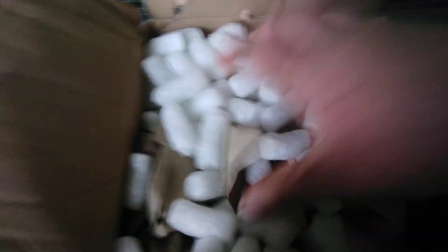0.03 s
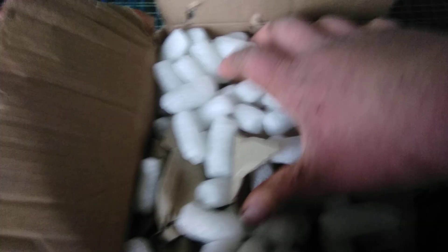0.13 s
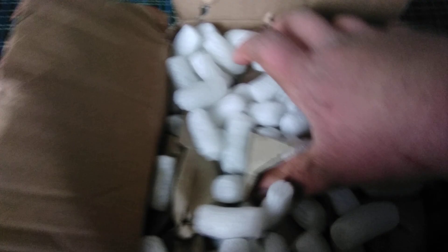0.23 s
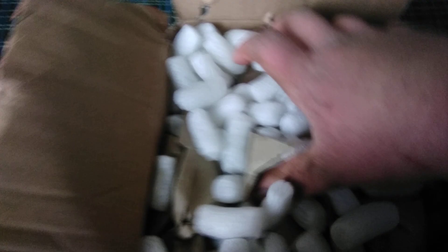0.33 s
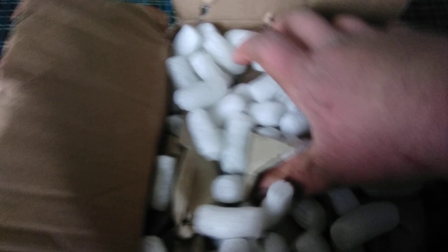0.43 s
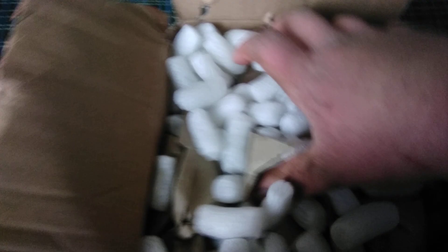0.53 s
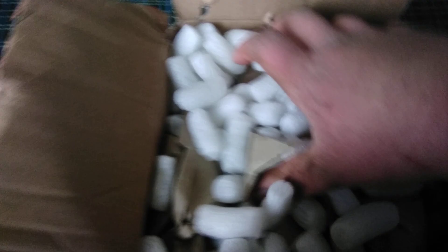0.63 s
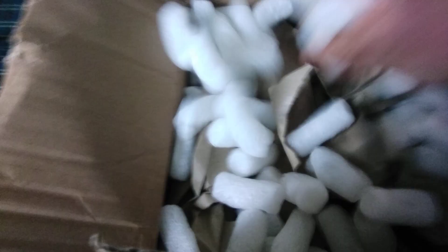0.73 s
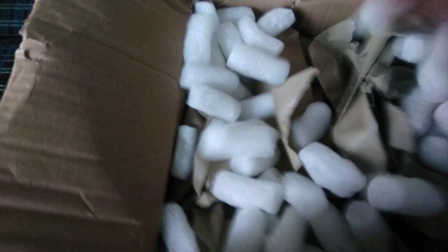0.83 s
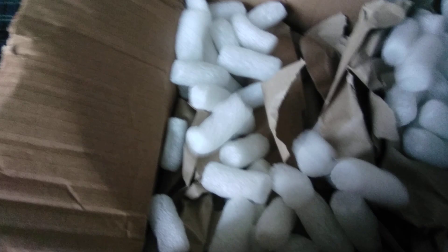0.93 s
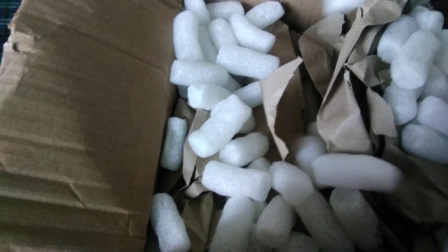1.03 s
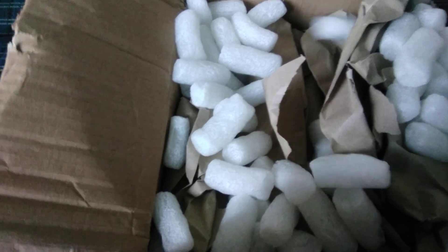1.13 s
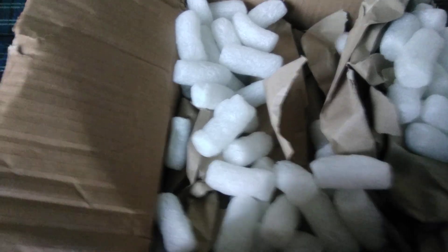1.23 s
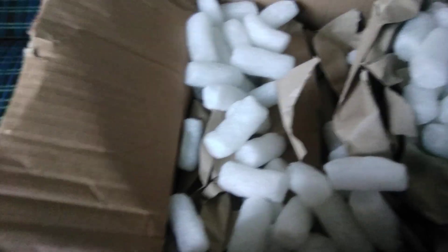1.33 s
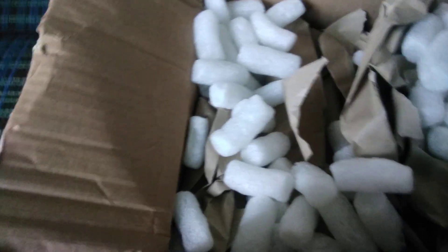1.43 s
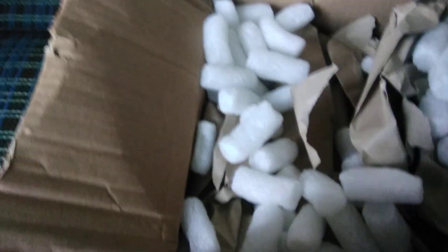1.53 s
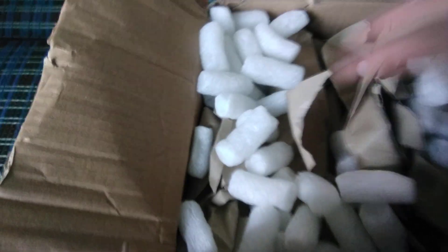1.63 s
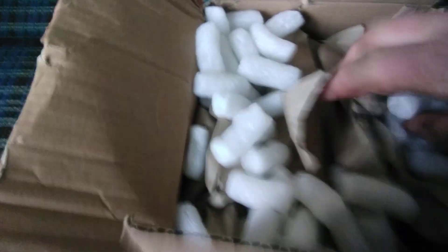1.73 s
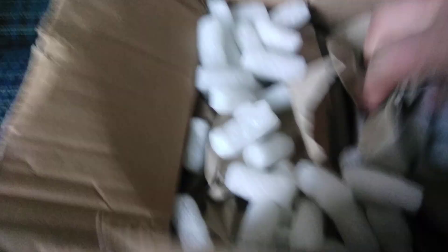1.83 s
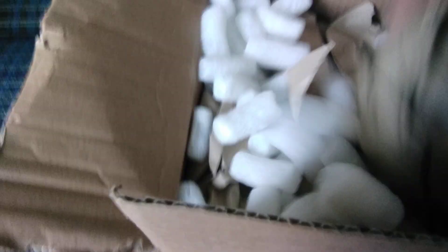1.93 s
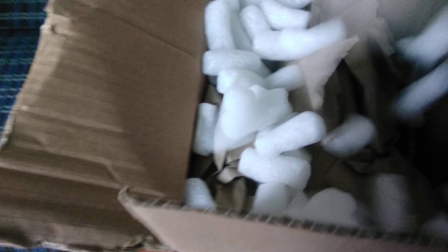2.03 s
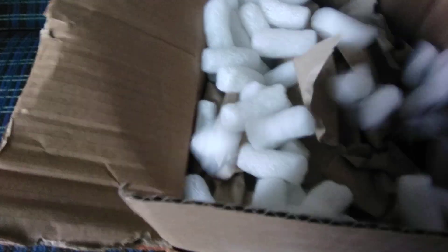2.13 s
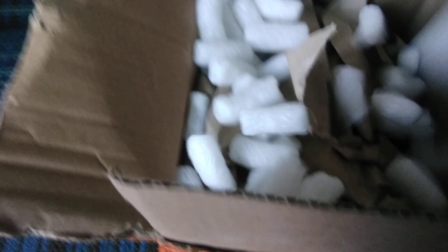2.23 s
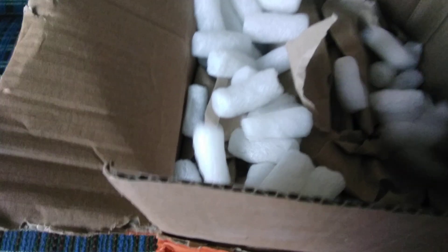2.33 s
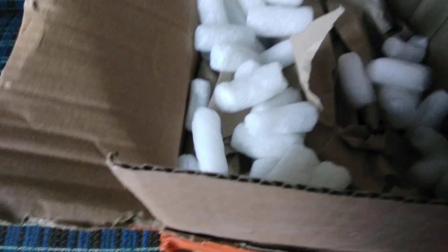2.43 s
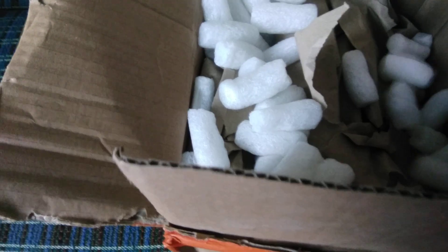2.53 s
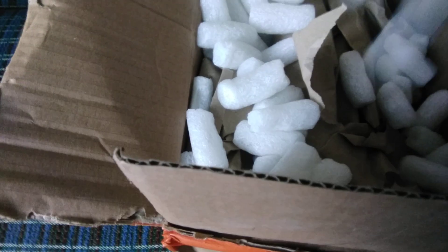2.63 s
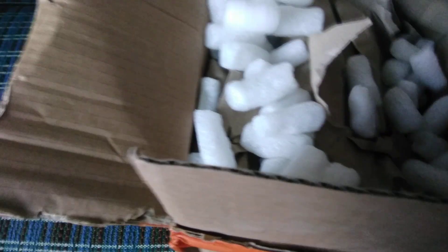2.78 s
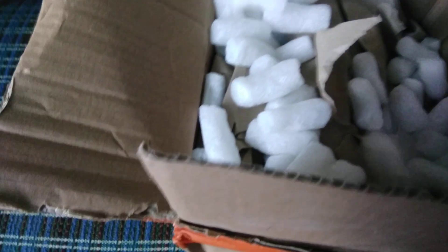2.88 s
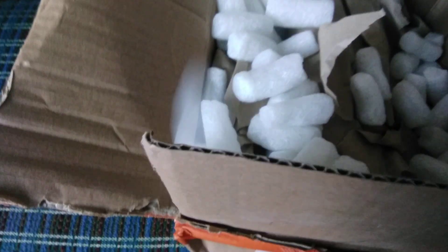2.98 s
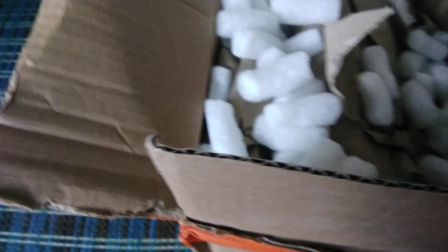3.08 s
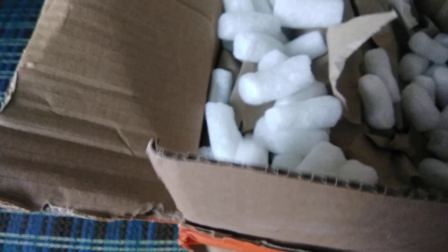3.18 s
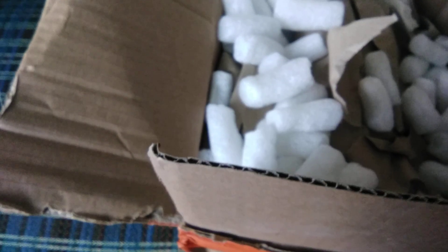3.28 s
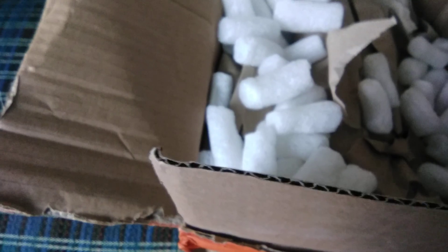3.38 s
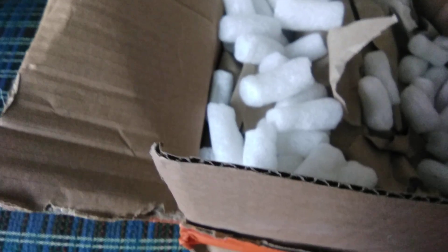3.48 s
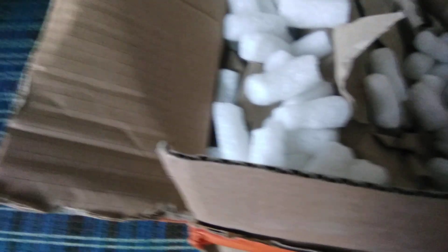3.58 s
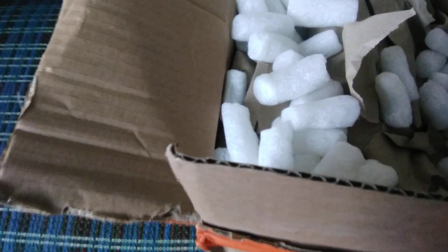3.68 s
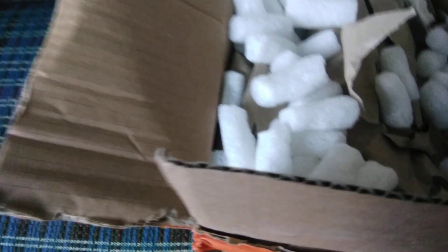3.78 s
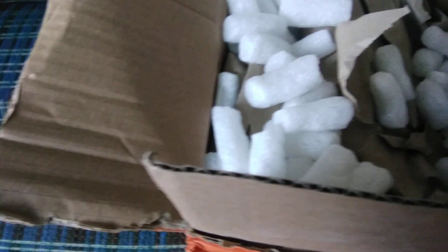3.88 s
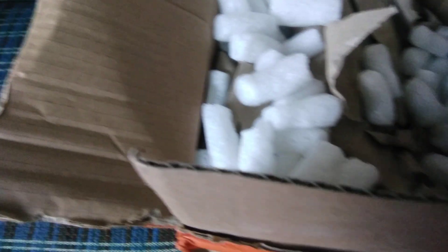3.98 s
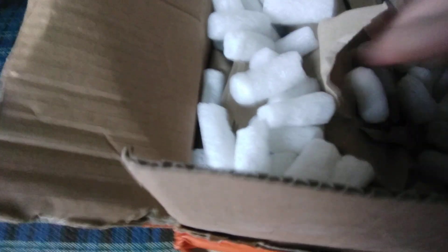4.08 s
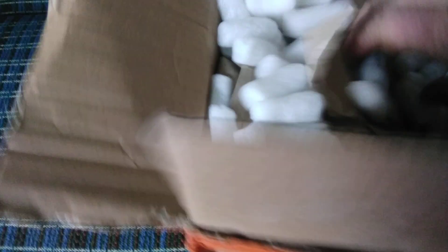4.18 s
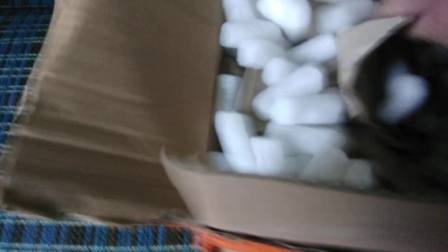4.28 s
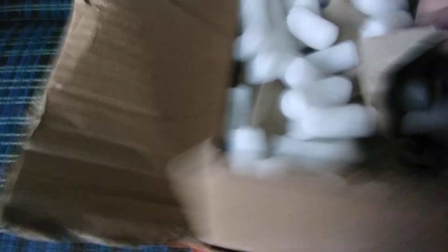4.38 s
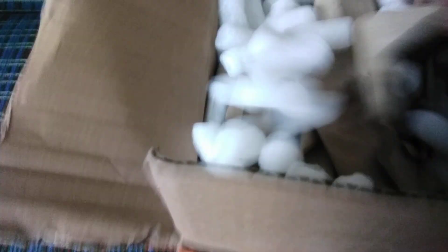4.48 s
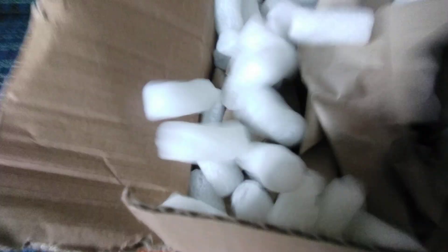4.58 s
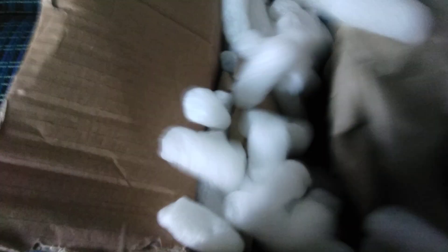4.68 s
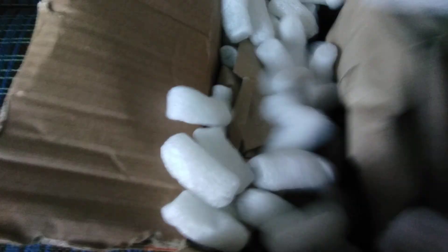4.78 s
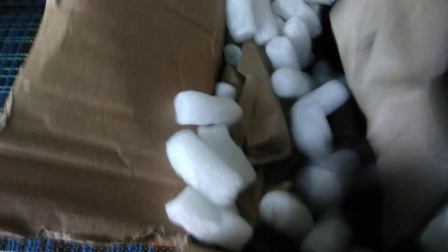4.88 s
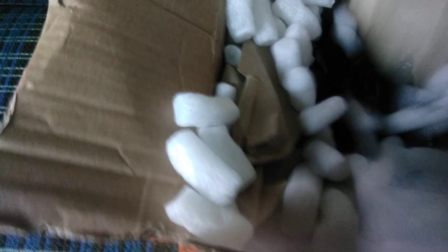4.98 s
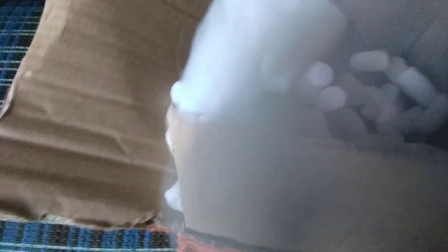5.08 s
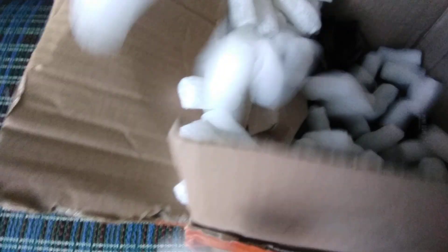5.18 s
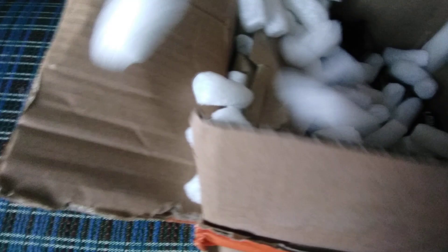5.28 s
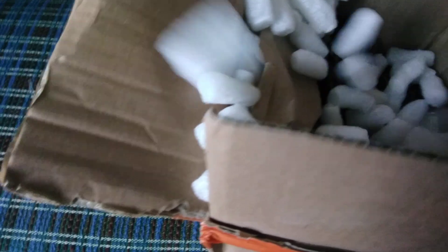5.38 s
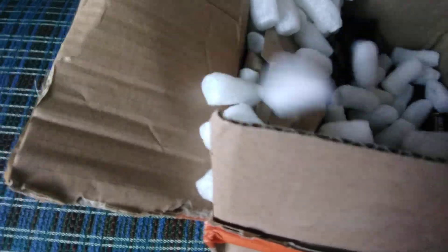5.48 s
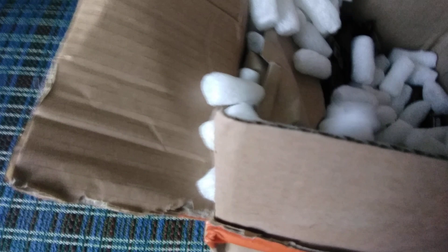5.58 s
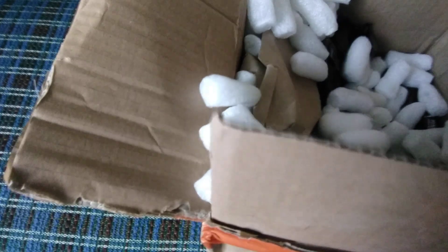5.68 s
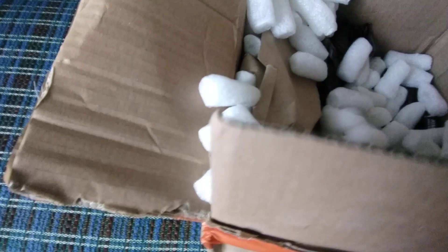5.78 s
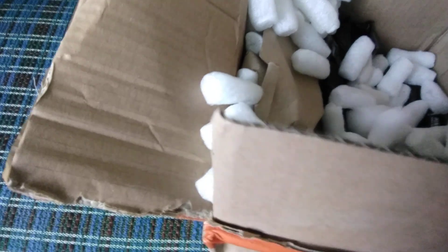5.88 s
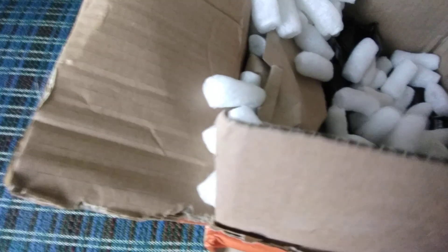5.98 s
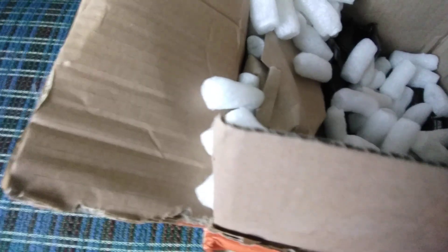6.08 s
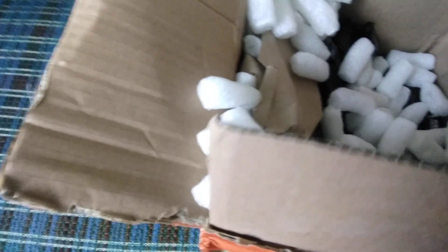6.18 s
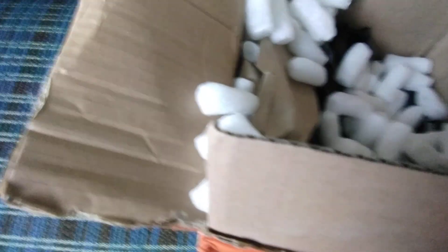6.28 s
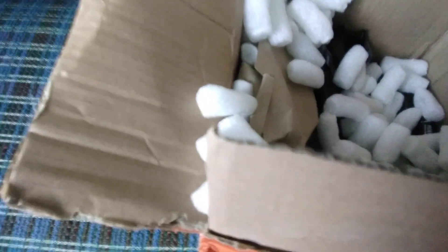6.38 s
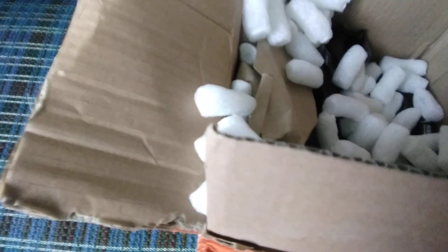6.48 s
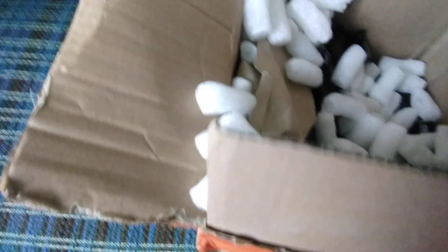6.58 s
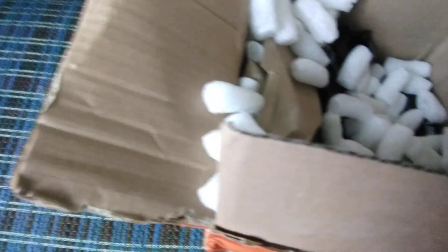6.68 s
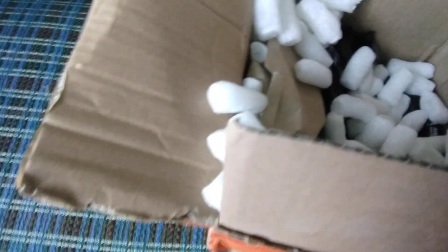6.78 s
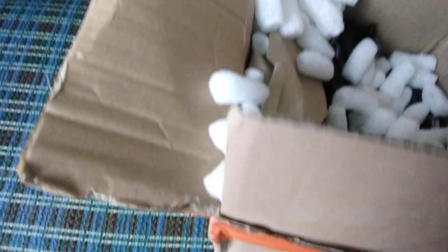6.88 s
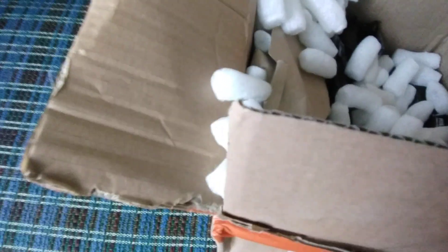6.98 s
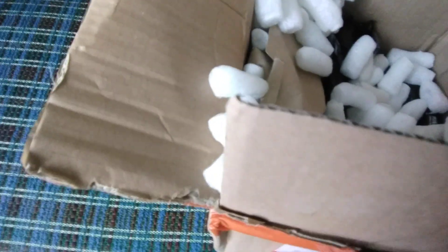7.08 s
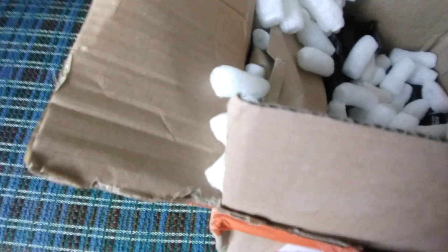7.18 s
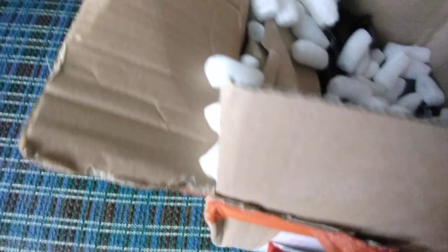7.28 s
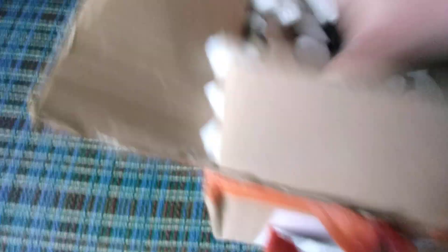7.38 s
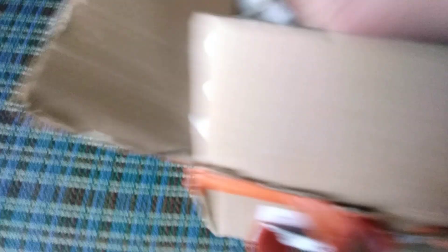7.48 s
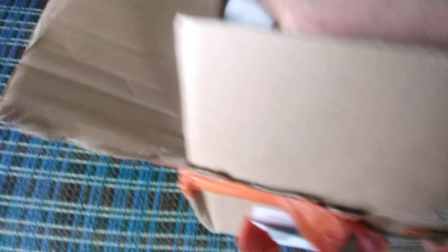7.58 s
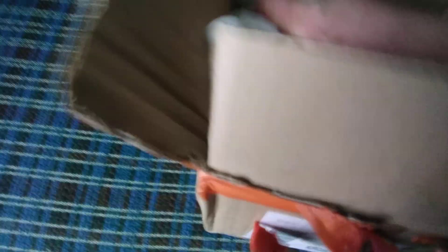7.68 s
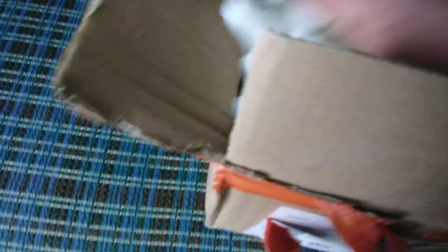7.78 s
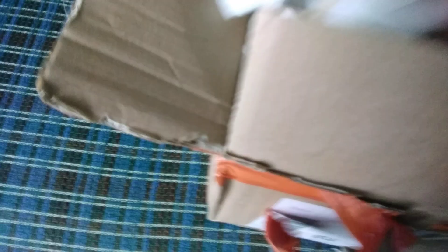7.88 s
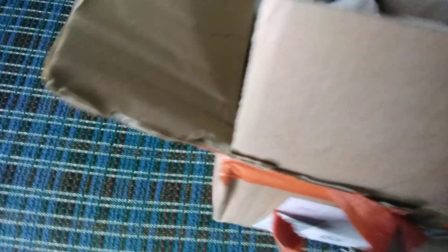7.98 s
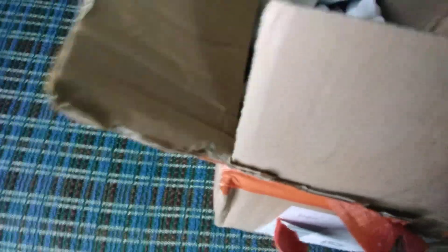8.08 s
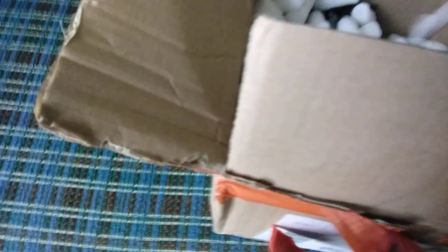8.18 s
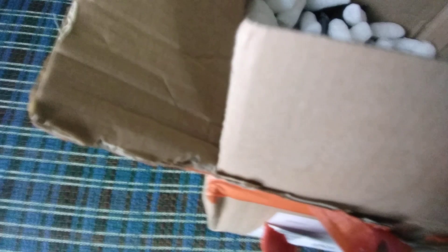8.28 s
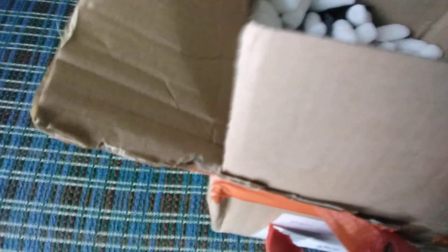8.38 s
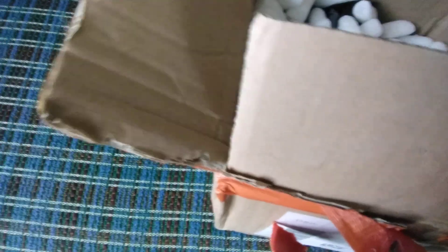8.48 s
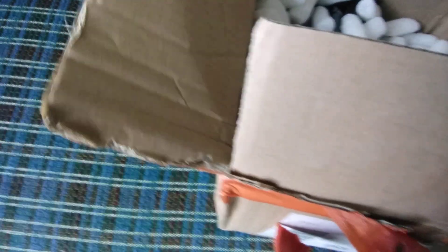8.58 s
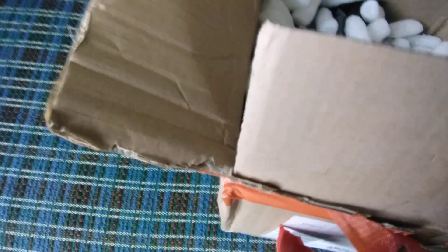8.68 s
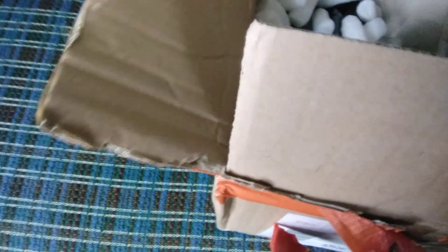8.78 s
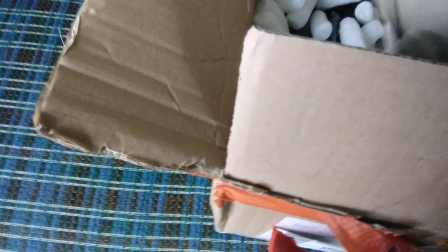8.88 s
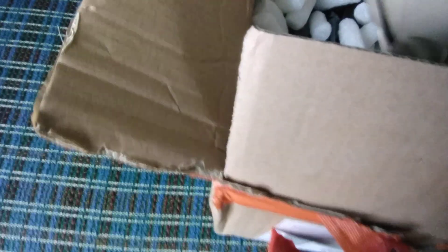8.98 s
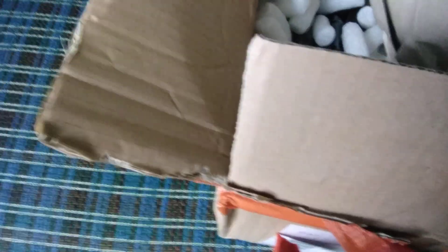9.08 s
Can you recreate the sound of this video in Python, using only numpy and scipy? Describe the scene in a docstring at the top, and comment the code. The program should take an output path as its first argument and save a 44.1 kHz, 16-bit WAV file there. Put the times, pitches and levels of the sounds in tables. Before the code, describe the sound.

A hand rummages close up through foam packing peanuts and paper in a cardboard box, swishing, snapping, crinkling and thumping, with short near-silent pauses.

```python
"""After a tenth of a second of silence a hand stirs foam packing peanuts and paper in a cardboard box, up
close. From about 2.7 s come single shoves, from 4.4 s more stirring; it goes faint near 6.6 s, then works up
again to the end. Tiny ringing slips make the foam swish, tick and crunch, and the paper crinkle; noise bursts
make the snaps. Short decaying tones with noise make creases pop and peanuts tap the card, and blunt pulses with
a low sway make the box thump. Resonances make the dug-out box sound hollow; a small, soft room and quiet air
lie around it all."""
import sys
import numpy as np
from scipy import signal
from scipy.fft import rfft, irfft
from scipy.io import wavfile
from scipy.ndimage import uniform_filter1d

SR = 44100
rng = np.random.default_rng(int(sys.argv[2]) if len(sys.argv) > 2 else 0)


def unload_wav(signal):
    """Save mono or channel-first audio to the path in sys.argv[1] as 16-bit WAV at rate SR, clipped to [-1, 1]."""
    wavfile.write(
        sys.argv[1],
        SR,
        np.round(np.clip(np.atleast_2d(signal).T, -1, 1) * 32767).astype(np.int16),
    )


N = 401751
TIME = np.arange(N) / SR  # seconds


def gain_of(db):
    """Turns decibels into a factor."""
    return 10 ** (np.asarray(db) / 20)


def evened(x):
    """Scales a sound to an average (rms) level of 1."""
    return x / np.sqrt(np.mean(x ** 2) + 1e-20)


def read(points, hz):
    """Reads a table at any frequency, joining its points by straight lines over log frequency."""
    f, value = np.transpose(points)
    return np.interp(np.log(hz + 1), np.log(f + 1), value)


def add(mix, s, sound):
    """Mixes a sound in at s seconds."""
    part = mix[max(round(s * SR), 0):][:len(sound)]
    part += sound[:len(part)]


def colour(x, points, size=2048):
    """Filters to the given spectrum with no sound ahead of time, so that clicks keep their sharp front."""
    gain = gain_of(read(points, abs(np.fft.fftfreq(size, 1 / SR))))
    # the Hilbert transform of the log gain supplies the minimum-phase timing
    spectrum = np.exp(np.conj(signal.hilbert(np.log(gain))))
    taps = np.fft.ifft(spectrum).real[:size // 2]
    return signal.oaconvolve(x, taps)[:len(x)]


def wander(length, hz):
    """Smooth random movement of rms 1, mostly slower than hz."""
    f = np.fft.rfftfreq(length, 1 / SR)
    spectrum = rfft(rng.standard_normal(length)) / (1 + (f / hz) ** 4)
    return evened(irfft(spectrum, length))


def grains(per_s, spread_db, low_hz, high_hz, cycles, count=18):
    """Countless small slips of uneven size; each rings one of many contacts for about the given cycles."""
    out = np.zeros(N)
    for hz in np.geomspace(low_hz, min(high_hz, SR / 2), count):
        chance, size = rng.random(N), rng.standard_exponential(N)
        at = np.flatnonzero(chance < per_s / count / SR)
        sign = (-1.) ** at
        slips = np.zeros(N)
        slips[at] = gain_of(spread_db * np.minimum(size[at], 4)) * sign
        # a two-pole resonator: the turn sets its pitch, the radius its decay
        turn = 2 * np.pi * hz / SR
        radius = np.exp(-hz / cycles / SR)
        top = [1, -radius * np.cos(turn)]
        bottom = [1, -2 * radius * np.cos(turn), radius * radius]
        out += hz * signal.lfilter(top, bottom, slips)
    return evened(out)


def steadied(x, span):
    """Holds the level near 1 over stretches of span seconds; faster crackle stays."""
    width = max(int(span * SR), 2)
    power = uniform_filter1d(uniform_filter1d(x ** 2, width), width)
    return x / np.sqrt(abs(power) + 1e-12)


def shifting(x, patchy_db, size=512):
    """Each new contact favours other pitches for a few hundredths of a second."""
    z = signal.stft(x, nperseg=size)[2]
    patches = rng.standard_normal(z.shape)
    # smooth twice across pitch (axis 0) and twice across time (axis 1)
    for axis, count in ((0, 5), (0, 3), (1, 7), (1, 4)):
        patches = uniform_filter1d(patches, count, axis)
    patchy = z * gain_of(patchy_db * evened(patches))
    return signal.istft(patchy, nperseg=size)[1][:N]


# Colour of the quiet air. Each row: frequency in Hz, relative level in dB per Hz.
AIR_COLOUR = [(30, -18.5), (60, -26), (120, -22), (450, -10), (2750, -28.5), (8000, -23.5), (16000, -21.5)]
AIR_DB = -69  # average level


def quiet_air():
    """Steady faint noise with the colour of the quiet room."""
    return gain_of(AIR_DB) * evened(colour(rng.standard_normal(N), AIR_COLOUR))


# How fast the room dies away. Each row: frequency in Hz, time to fall by 60 dB in seconds.
ROOM_DECAY = [(100, 0.41), (500, 0.085), (1800, 0.086), (5000, 0.12), (15000, 0.033)]


def room(x):
    """A diffuse tail of noise, each band dying at its own speed."""
    hz, t, z = signal.stft(rng.standard_normal(SR // 2), SR, nperseg=256)
    decay = gain_of(-60 * t / read(ROOM_DECAY, hz)[:, None])
    tail = signal.istft(z * decay, SR, nperseg=256)[1]
    # (Hz, relative dB)
    tail = colour(tail, [(100, -5.0), (450, -1.5), (800, 8.0), (1600, 4.5), (4000, 0.5), (8500, -1.0), (15000, -4.5)])
    tail *= 1 - np.exp(-np.arange(len(tail)) / SR / 0.0007)  # soft onset
    return signal.fftconvolve(x, tail / np.linalg.norm(tail))[:N]


# The passing hand pushes air against the microphone.
# The one row: start in seconds, length in seconds, level of the swell in dB before its flutter.
AIR_PUSH = (0.47, 0.094, -15.5)


def draught():
    """One slow swell of pressure with a little flutter on it."""
    s, length, db = AIR_PUSH
    out, size = np.zeros(N), round(length * SR)
    flutter = 1 + 0.22 * wander(size, 130)
    add(out, s, gain_of(db) * signal.windows.tukey(size, .5) * flutter)
    return out


# The box is knocked. Each row: start in seconds, relative level in dB,
# pitch of the wall's sway in Hz, sway against the knock in dB.
BOX_KNOCKS = [(0.473, -16.5, 83, -2), (0.612, -13, 169, -32), (0.75, -15, 75, -19), (0.764, -21, 55.7, 0),
              (0.886, -16.5, 89, -4), (0.935, -21, 57.5, -1), (1.239, -42, 140, -12),
              (1.363, -33, 261, -10), (1.408, -36, 110, -12), (2.399, -23, 55.7, -5), (2.484, -24, 153, -5),
              (2.864, -14, 68, -12), (3.082, -11, 60.4, -7), (3.106, -16, 59, -29),
              (3.237, -10.5, 65.3, -1), (4.194, -23.5, 56, -5), (4.344, -11.5, 70.5, -13),
              (4.558, -22, 200, -3), (4.96, -12, 205, -9.5), (5.002, -14.5, 78, -11), (5.09, -25, 74, 4),
              (5.241, -21, 180, -2.5), (5.346, -22, 180, -10), (5.672, -24.5, 116, -15),
              (6.321, -16, 302, -12), (6.796, -35, 210, -13), (7.139, -24, 203, -13),
              (7.427, -18.5, 95.6, 3.5), (7.864, -12, 189, -32), (8.104, -7.5, 60, -12.5),
              (8.807, -7, 149, -19)]
# Colour of a knock on the box. Each row: frequency in Hz, relative level in dB per Hz.
KNOCK_COLOUR = [(25, -12), (70, -2), (200, 0), (400, 1), (600, -8), (850, -12), (1500, -19.5),
                (4000, -50.5)]


def thumps(size=8192):
    """One blunt push on the cardboard, a short shudder of the filling, and the slow sway of the whole wall."""
    out, t = np.zeros(N), np.arange(size) / SR
    for s, db, hz, sway_db in BOX_KNOCKS:
        shudder = 0.096 * rng.standard_normal(size) * np.exp(-t / 0.015)
        knock = colour(signal.unit_impulse(size) + shudder, KNOCK_COLOUR)
        sway = np.sin(2 * np.pi * hz * t) * (1 - np.exp(-t / 0.0024)) * np.exp(-t / 0.016)
        both = knock / abs(knock).max() + gain_of(sway_db) * sway / abs(sway).max()
        add(out, s, gain_of(db - 1.5) * both)
    return out


# A crease in the paper flips over (high pitches), or a peanut taps the cardboard (low pitches). # Each row:
# start in seconds, relative level in dB, pitch in Hz.
POPS_AND_TAPS = [(1.122, -29, 544), (1.173, -18.5, 1300), (1.201, -35, 393), (1.362, -31.5, 624),
                 (1.909, -6.5, 1210), (2.06, -6, 2840), (2.8, -4.5, 2870), (3.11, -16, 900),
                 (3.308, -14, 1430), (3.466, -27.5, 2220), (3.61, -33, 405), (3.782, -23.5, 830),
                 (4.344, -10, 960), (4.4, -10.5, 1570), (4.511, -19, 413), (4.651, -19, 455),
                 (5.206, -27, 536), (5.269, -15, 1280), (5.348, -22, 720), (5.432, -25, 880),
                 (5.673, -19, 1030), (6.79, -30.5, 1380), (6.793, -30, 5250), (7.598, -11.5, 1340),
                 (7.802, -12, 1750), (7.906, -8, 1670), (8.049, -5.5, 1060), (8.382, -13, 990),
                 (8.764, -30, 300), (8.966, -16.5, 1810)]


def pops(size=2048):
    """A crease flips over or a peanut taps the card; either rings for a few cycles, with a short papery rattle."""
    out, t = np.zeros(N), np.arange(size) / SR
    for s, db, hz in POPS_AND_TAPS:
        ring = np.sin(2 * np.pi * hz * t) * (1 - np.exp(-t / 0.00021)) * np.exp(-t * hz / 2.05)
        around = [(hz / 4, -24), (hz, 0), (2 * hz, -5), (6 * hz, -30)]  # (Hz, dB)
        rattle = colour(rng.standard_normal(size) * np.exp(-t / 0.0046), around)
        both = 0.77 * ring / abs(ring).max() + 0.17 * rattle / abs(rattle).max()
        add(out, s, gain_of(db) * both)
    return out


# A peanut slips free with a snap. Each row: start in seconds, length of the slip in milliseconds,
# level in dB, extra fullness below about 4 kHz in dB.
PEANUT_SNAPS = [(0.4252, 3.5, -12.5, 2), (0.4987, 6.2, -7.5, 3), (0.6594, 1.5, -10, 11),
                (0.7511, 1.9, -4.5, 8), (0.8097, 1.8, -11, -8), (0.8839, 1.8, -6.5, 10),
                (1.8635, 2.8, 0, -10), (1.8772, 1.0, -12, -13.0), (1.909, 1.1, -9, 18),
                (2.0428, 2.8, -7.5, -10), (2.22, 1.1, -16, -18), (2.5688, 1.2, -14, -8),
                (2.801, 3.3, -4.5, 2.0), (2.8648, 2.7, -10.5, -5), (2.8914, 1.3, -3.5, -10),
                (2.8977, 1.6, -8, -7), (2.9975, 1.0, -27, -20.0), (3.0367, 2.4, -12.5, -28),
                (3.0653, 2.2, -19, -21), (3.5659, 0.73, -11, -9.5), (3.6728, 1.1, -9.5, -4.5),
                (4.308, 5.4, -18, 9), (4.3343, 2.2, -18, 8), (4.3443, 3.1, -15, 13), (4.646, 1.3, -17, 1),
                (4.8201, 3.4, -3.5, -4), (4.844, 1.0, -7, -2), (5.0606, 2.2, -17, -2),
                (5.1051, 1.2, -14.0, -8.0), (5.115, 0.73, -17, -9), (5.257, 1.1, -17, -13),
                (5.286, 4.1, -17, -7), (5.375, 4.6, -16.5, -11), (5.4338, 1.8, -23, 6),
                (5.5337, 6.6, -20.5, 0.0), (5.5458, 1, -17, -2), (5.9029, 1.5, -8.5, -7),
                (6.1906, 5.9, -18, 11), (6.2091, 4.9, -15.5, 3), (6.3223, 1.5, -13, 4),
                (6.4613, 1.3, -6, 6), (7.32, 0.7, -16, -27), (7.485, 4.6, -19, -9), (7.598, 1.3, -10.0, -3),
                (7.6475, 3.8, -23, 2), (7.7104, 1.8, -11, 5), (7.8055, 0.92, -9, -8.0),
                (7.8655, 5.4, -11.5, 16), (7.9059, 0.81, -9.5, -4), (8.0491, 5.1, -11.5, 18),
                (8.1061, 3.2, -11, 15), (8.2712, 2.4, -15.5, 0), (8.3814, 2.1, -7, -9),
                (8.8076, 1.2, -12, -5), (8.8757, 1.2, -9.5, -22), (8.9631, 2.9, -23, 3),
                (9.0087, 1.03, -23, -27), (9.028, 1, -21, -28)]
# Colour of a snap. Each row: frequency in Hz, relative level in dB per Hz.
SNAP_COLOUR = [(500, -13.5), (2000, -2.5), (4500, -2), (8500, 5), (11000, -7), (16000, -16.5)]
SNAP_RISE_S, SNAP_RELEASE_S = 0.0002, 0.001


def snaps(size=2048):
    """A burst of slips, mostly a few milliseconds long, that dies quickly as the piece comes free."""
    out, t = np.zeros(N), np.arange(size) / SR
    for s, ms, db, full_db in PEANUT_SNAPS:
        length = max(ms, .3) / 1000
        release = np.exp(-np.maximum(t - 0.68 * length, 0) / SNAP_RELEASE_S)
        slip = (1 - np.exp(-t / SNAP_RISE_S)) * release
        tone = [(hz, level + full_db / (1 + (hz / 4000) ** 4)) for hz, level in SNAP_COLOUR]
        snap = colour(rng.standard_normal(size) * slip, tone)
        add(out, s, gain_of(db) * snap * np.sqrt(length * SR / np.sum(snap ** 2)))
    return out


# Squeezed peanuts grind, then let go. Each row: start in seconds, length in seconds,
# average level in dB before the hollow colours it, growth over the stroke in dB.
SQUEEZES = [(0.468, 0.033, -17.5, -6), (0.506, 0.04, -10, -13), (0.605, 0.066, -26.5, -4),
            (0.877, 0.015, -17.5, 1), (1.757, 0.03, -15, -3), (1.79, 0.03, -16, 5), (1.942, 0.06, -17, -6),
            (2.017, 0.019, -14, 4), (2.864, 0.015, -16.5, -12), (3.035, 0.021, -22.5, 0),
            (3.08, 0.011, -15.5, -15), (4.356, 0.013, -16, -9), (4.391, 0.014, -20, 6),
            (4.726, 0.055, -24, -3), (4.918, 0.054, -13.5, 5), (4.997, 0.043, -15, 1),
            (5.037, 0.033, -12.5, 0), (5.576, 0.024, -20.5, 5), (5.748, 0.022, -21, 0),
            (5.844, 0.022, -16.5, -2), (5.897, 0.025, -15.5, -8), (5.993, 0.038, -22.5, -4),
            (6.036, 0.034, -13, 7.5), (6.113, 0.017, -19, 5), (6.206, 0.022, -10.5, -0.5),
            (6.272, 0.015, -18, -2), (6.295, 0.071, -15.5, -5.5), (6.442, 0.026, -15.5, -6),
            (6.482, 0.043, -16, -8), (7.134, .03, -29, -19), (7.855, 0.017, -18.5, 16),
            (8.084, 0.03, -20, 15), (8.376, 0.012, -12, 8), (8.871, 0.011, -18.5, 10)]
# Colour of grinding foam. Each row: frequency in Hz, relative level in dB per Hz.
GRIND_COLOUR = [(100, -13.5), (500, -13), (1400, -11), (3000, -9.5), (5500, -9.5), (7500, -4), (8800, -0.5),
                (10500, -9), (13000, -13.5), (16000, -17.5)]


def crunches():
    """Foam pressed on foam: a dense run of stick and slip that stops as the pieces part."""
    grind = grains(per_s=9000, spread_db=1.2, low_hz=500, high_hz=15000, cycles=1.3)
    roughness = gain_of(0.32 * wander(N, 250))
    grind = shifting(colour(grind * roughness, GRIND_COLOUR), patchy_db=0.15)
    out = np.zeros(N)
    for s, length, db, growth_db in SQUEEZES:
        stroke = grind[round(s * SR):][:max(round(length * SR), 64)]
        push = gain_of(np.linspace(0, growth_db, len(stroke))) * signal.windows.tukey(len(stroke), .25)
        add(out, s, gain_of(db) * evened(stroke * push))
    return out


# The hollow that the hand digs. Each row: time in seconds, depth of the hand in it from 0 to 1,
# pitch factor of its resonances.
HAND_DEPTH = [(0.1, 0, 1.13), (2.3, 0.58, 0.97), (3.2, 0.7, 1.02), (5.1, 0.18, 0.98), (5.7, 1, 0.99),
              (6.35, 0.9, 0.92), (6.56, 1, 1.09), (7.2, 0.46, 1.05), (7.7, 0.5, 1.22), (8.1, 0, 1.2),
              (8.6, 0.6, 1.8)]
# The hollow's resonances. Each row: frequency in Hz before the pitch factor, level in dB at full depth.
RESONANCES = [(190, -4.5), (340, 3), (640, -11), (1040, 0.5), (1230, -1), (1520, 5.5), (1800, 2),
              (2110, -6.5), (2700, -0.5), (3550, -4.5), (4600, -3.5), (6500, -1)]


def hollow(x, size=512):
    """Deep in the box the rustle takes on the resonances of the space around the hand, which rise as it narrows."""
    hz, t, z = signal.stft(x, SR, nperseg=size)
    s, depth, pitch = np.transpose(HAND_DEPTH)
    depth_now = np.clip(np.interp(t, s, depth), 0, 1)
    db = depth_now * read(RESONANCES, hz[:, None] / np.interp(t, s, pitch))
    return signal.istft(z * gain_of(db), nperseg=size)[1][:N]


# Spells of steady stirring, one list of rows each. Each row: time in seconds, then the relative levels
# of foam rubbing, paper crinkling and box drumming in dB.
STIR_SPELLS = [
    [(0.28, -27.5, -35.5, -41.5), (0.474, -22, -31, -38), (0.758, -25, -27.5, -35.5),
     (0.938, -34.5, -43, -44), (1.09, -38, -53.5, -50), (1.37, -58.5, -73, -73), (1.55, -64, -84, -70),
     (1.68, -71.5, -84, -82.5)],
    [(1.89, -23.5, -29.5, -40.5), (1.938, -21.5, -29, -35.5), (2.074, -38, -44, -41.5),
     (2.346, -28, -33, -36.5), (2.472, -32.5, -40.5, -37.5), (2.612, -27.5, -34.5, -44.5),
     (2.69, -32.5, -45.5, -54)],
    [(4.41, -27, -34.5, -37.5), (4.732, -21.5, -29, -34), (4.94, -24, -31.5, -41),
     (5.082, -30.5, -31.5, -36.5), (5.19, -30, -37.5, -34.5), (5.326, -33, -38, -40),
     (5.43, -31.5, -38, -41)],
    [(5.53, -31.5, -36, -34.5), (5.658, -28, -37, -52), (5.818, -28.5, -41, -61), (6.174, -31, -38, -55),
     (6.356, -28, -30.5, -54), (6.448, -26.5, -34, -59), (6.5, -34, -48, -65)],
    [(7.55, -29, -37, -48), (7.638, -20.5, -30, -46), (7.762, -24.5, -24.5, -44), (8.198, -35, -41.5, -44),
     (8.304, -36.5, -41.5, -45.5), (8.468, -34, -33.5, -49), (8.53, -41.5, -43, -59), (8.58, -38, -61, -64)],
]
# How strongly stirring works on each material: foam, paper and box, in dB added to the levels above.
STIR_BOOST = (1, 2, 0)
STIR_FADE_S = 0.061  # the fingers start and come to rest this fast


def stirring():
    """Strength of foam, paper and box while the fingers keep stirring."""
    power = np.zeros((3, N))
    for spell in STIR_SPELLS:
        s, *levels = np.transpose(spell)
        moving = np.clip(np.minimum(TIME - s[0], s[-1] - TIME) / STIR_FADE_S + 1, 0, 1)
        strength = [moving * gain_of(np.interp(TIME, s, level) + db) for level, db in zip(levels, STIR_BOOST)]
        power = np.maximum(power, np.square(strength))
    return np.sqrt(power)


# Single shoves of the hand. Each row: start in seconds, time to speed up in seconds,
# time from the start until the push stops in seconds, then relative levels of foam, paper and box in dB.
HAND_SHOVES = [(0.102, 0.0075, 0.12, -31.5, -40, -49.5), (0.245, 0.057, 0.054, -18, -25, -39),
               (0.72, 0.036, 0.19, -21, -25.5, -32.5), (1.129, 0.016, 0.066, -32, -39, -62),
               (1.22, .02, 0.09, -47, -58, -72), (1.36, 0.01, 0.091, -73, -74, -55.5),
               (1.702, 0.03, 0.14, -21.5, -29.5, -36), (1.93, 0.028, 0.14, -18, -24.5, -32),
               (2.29, 0.03, 0.042, -19, -30.5, -48), (2.746, 0.067, 0.21, -27, -39.5, -46),
               (2.861, 0.0042, 0.022, -20, -26, -24.5), (3.0, 0.04, 0.12, -26.5, -36, -40.5),
               (3.17, 0.034, 0.034, -37.5, -44, -52), (3.235, 0.004, 0.0071, -26.5, -38, -57),
               (3.325, 0.031, 0.08, -24.5, -41.5, -70), (3.535, 0.035, 0.14, -25, -42, -69),
               (3.6, 0.0077, 0.061, -39, -34, -41.5), (3.68, 0.03, 0.08, -30, -62, -62),
               (3.758, 0.014, 0.014, -20.5, -37, -39.5), (3.84, 0.036, 0.069, -40.5, -66, -49),
               (4.055, 0.0072, 0.04, -47, -57.5, -77.5), (4.18, 0.01, 0.049, -20.5, -29, -31.5),
               (4.267, 0.02, 0.1, -24, -26.5, -34.5), (4.715, 0.0099, 0.046, -22, -44, -49),
               (4.93, 0.14, 0.12, -13, -39, -29.5), (5.86, 0.011, 0.079, -23, -30, -44),
               (6.035, 0.013, 0.016, -33, -30, -33), (6.14, 0.008, 0.07, -18.5, -23, -32),
               (6.295, 0.025, 0.07, -15.5, -21, -30.5), (6.44, 0.011, 0.034, -18.5, -25, -32),
               (6.51, 0.058, 0.076, -26.5, -36, -73), (6.69, 0.046, 0.16, -52.5, -66, -65),
               (6.898, 0.045, 0.075, -37, -56, -65), (7.0, 0.031, 0.071, -28, -48, -63.5),
               (7.132, 0.0051, 0.038, -21.5, -27, -34), (7.306, 0.021, 0.023, -28.5, -65, -54),
               (7.427, 0.0085, 0.055, -27.5, -43, -47), (7.463, 0.016, 0.062, -25, -29.5, -38.5),
               (7.61, 0.077, 0.13, -20, -18.5, -32.5), (7.76, 0.0084, 0.026, -19.5, -23.5, -30.5),
               (8.088, 0.0052, 0.025, -30, -22, -30), (8.354, 0.019, 0.054, -18.5, -25.5, -41.5),
               (8.611, 0.027, 0.082, -24, -30, -53), (8.688, 0.049, 0.081, -14.5, -26.5, -58),
               (8.79, 0.053, 0.083, -18, -38, -43), (8.99, 0.035, 0.047, -32.5, -72, -61)]
STOP_DB_PER_S = 333.5  # after a push the filling stops quickly,
SETTLE_DB, SETTLE_DB_PER_S = -24.5, 89  # and a few pieces go on settling


def shoving():
    """Strength of foam, paper and box under shoves: each speeds up, pushes, stops and lets the filling settle."""
    power, t = np.zeros((3, N)), np.arange(SR) / SR
    for s, rise, length, *levels_db in HAND_SHOVES:
        after = np.maximum(t - length, 0)
        stopping = gain_of(-STOP_DB_PER_S * after)
        settling = gain_of(SETTLE_DB - SETTLE_DB_PER_S * after)
        push = np.minimum(t / max(rise, .001), 1) * np.maximum(stopping, settling)
        for material, db in zip(power, levels_db):
            add(material, s, (gain_of(db) * push) ** 2)
    return np.sqrt(power)


# Colour of bumped cardboard. Each row: frequency in Hz, relative level in dB per Hz.
CARD_COLOUR = [(25, -17.5), (60, 7.5), (100, -2), (200, 0), (300, -0.5), (420, 2.5), (600, 0.5),
               (850, -3.5), (1500, -21), (5000, -68.5)]


def cardboard():
    """Many low bumps on the box; cardboard is too dead to hold a pitch."""
    return colour(grains(per_s=900, spread_db=3.3, low_hz=60, high_hz=1400, cycles=.9), CARD_COLOUR)


# Colour of crinkling paper. Each row: frequency in Hz, relative level in dB per Hz.
PAPER_COLOUR = [(200, -22.5), (600, -13.5), (1000, -4.5), (1600, -3.5), (2300, -3), (3500, -4.5),
                (5500, -7), (12000, -31.5)]


def paper():
    """Many small creases give way, each with a very short ring."""
    return colour(grains(per_s=1900, spread_db=2.0, low_hz=605, high_hz=5100, cycles=1.0), PAPER_COLOUR)


# Colours of sliding foam, then of ticking foam (for the flicks too).
# Each row: frequency in Hz, relative level in dB per Hz.
SWISH_COLOUR = [(300, -36), (1500, -21.5), (4600, -16), (5800, -7.5), (7000, -3), (8000, -1.5), (8900, 0),
                (10200, -5), (12000, -13.5), (16000, -16)]
TICK_COLOUR = [(300, -20.5), (1500, -11.5), (3000, -9), (5000, -3.5), (6500, -2.5), (8400, 4), (10000, -5),
               (16000, -9.5)]


def foam(tumbling):
    """Dense slips swish and sparser ones tick; the tumbling share (0-1) blends them by power."""
    sliding = grains(per_s=16000, spread_db=-2.5, low_hz=1540, high_hz=15400, cycles=1.0)
    sliding = evened(colour(sliding, SWISH_COLOUR))
    ticking = grains(per_s=2200, spread_db=-2.0, low_hz=1520, high_hz=14200, cycles=1.2)
    ticking = evened(colour(ticking, TICK_COLOUR))
    return shifting(np.sqrt(1 - tumbling) * sliding + np.sqrt(tumbling) * ticking, patchy_db=2.2)


FLICKS_PER_S, FLICKS_DB = 83, -11.5  # average rate, and level relative to the foam's rubbing


def flicks():
    """Small foam snaps that come by chance."""
    slips = grains(per_s=FLICKS_PER_S, spread_db=2.3, low_hz=1500, high_hz=12500, cycles=1.5)
    return gain_of(FLICKS_DB) * evened(colour(slips, TICK_COLOUR))


def digging():
    """Foam slides and tumbles, paper crinkles and the box drums; all catch and give way together."""
    rubbing, crinkling, drumming = np.hypot(stirring(), shoving()) + 1e-9
    catching = gain_of(2.0 * wander(N, 35))
    # the harder the box drums against the rubbing, the more pieces tumble and tick
    tumbling = np.clip(gain_of(10.5) * drumming / rubbing, .01, .7)
    foam_sound = rubbing * (steadied(foam(tumbling) * catching, 0.089) + flicks())
    paper_sound = gain_of(-0.65) * crinkling * steadied(paper() * catching, 0.04)
    box_sound = gain_of(3.0) * drumming * steadied(cardboard() * catching, 0.2)
    return foam_sound + paper_sound + box_sound


def scene():
    """Everything in the box, the room around it, the draught and the quiet air."""
    box = hollow(digging() + crunches()) + snaps() + pops() + thumps()
    return (box + gain_of(-15.0) * room(box) + draught() + quiet_air())[None]


EDGE_HZ = 15950  # the treble ends here


def record(dry):
    """The input opens after a tenth of a second; the loudest peaks are rounded off; then the band limit."""
    opened = dry * np.clip((TIME - .102) / .004, 0, 1)
    rounded = opened / (1 + opened ** 6) ** (1 / 6)
    low_pass = signal.firwin(511, EDGE_HZ, window=("kaiser", 9), fs=SR)
    return signal.oaconvolve(rounded, low_pass[None], "same")


dry = scene()
out = record(dry)
unload_wav(out)
```